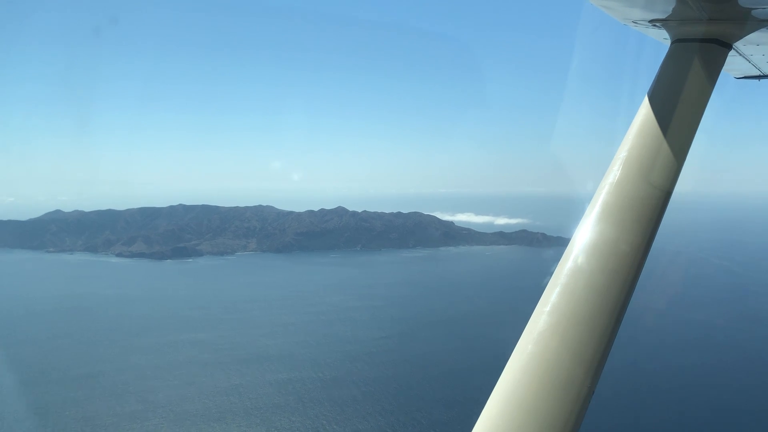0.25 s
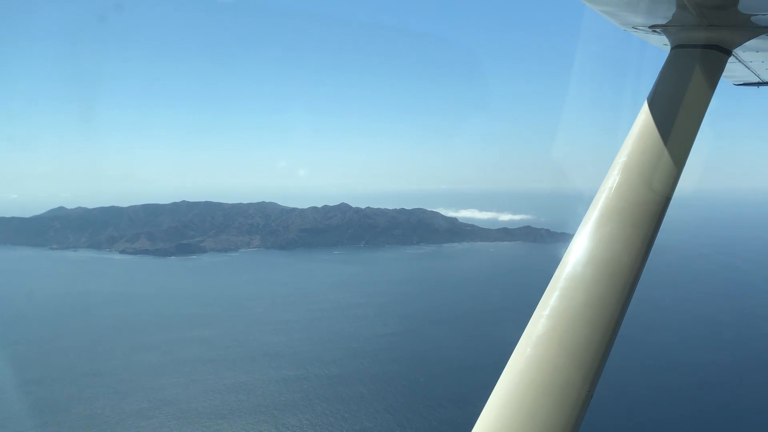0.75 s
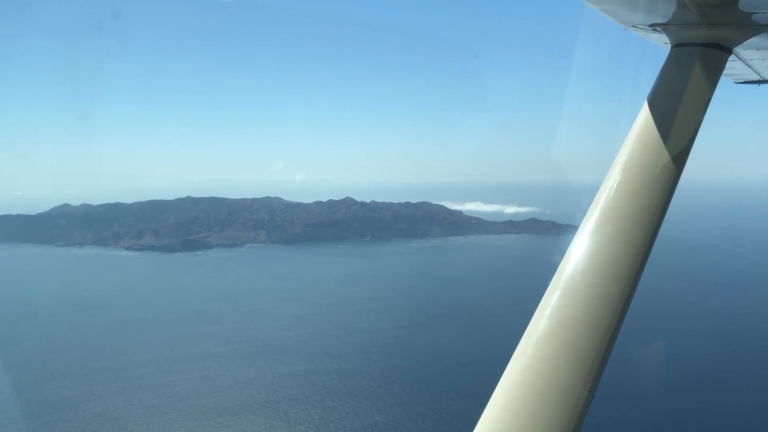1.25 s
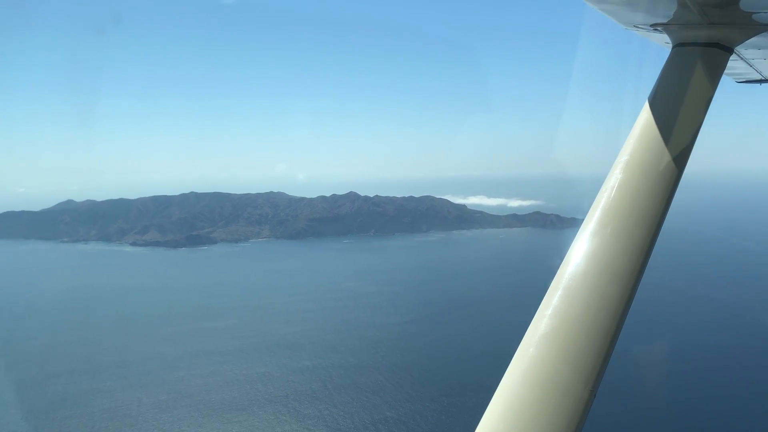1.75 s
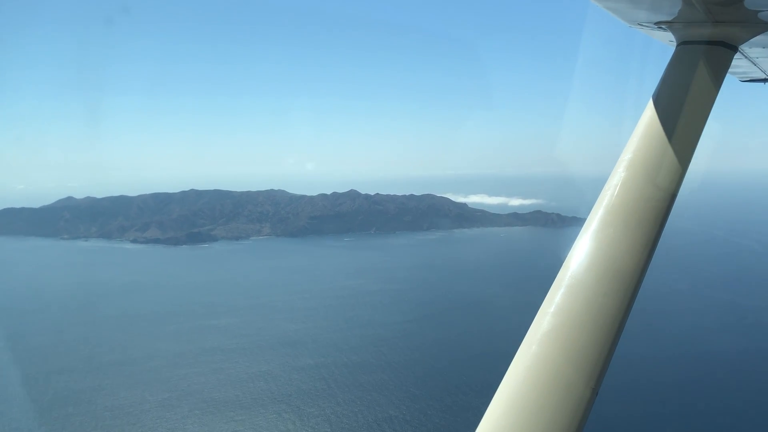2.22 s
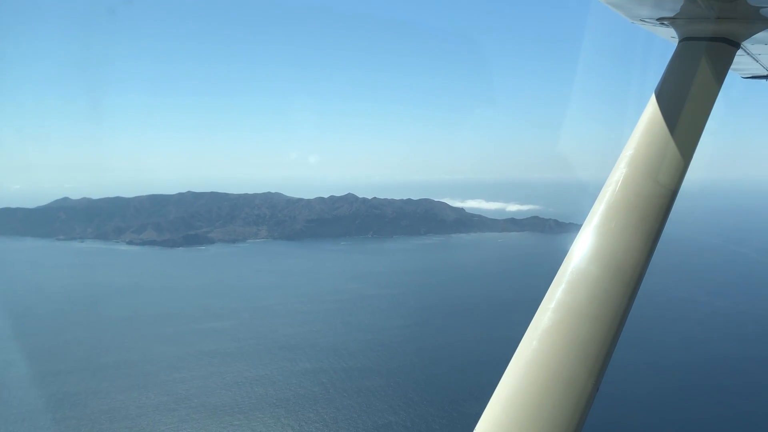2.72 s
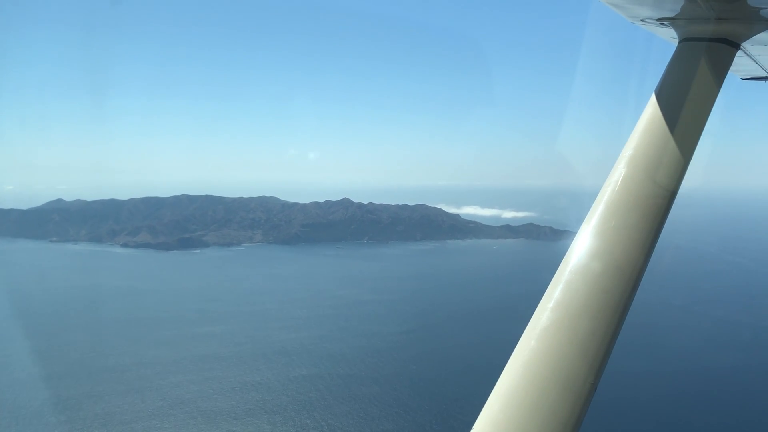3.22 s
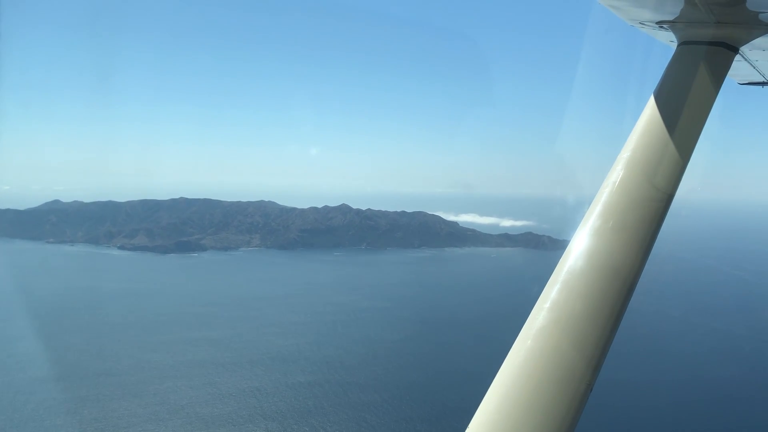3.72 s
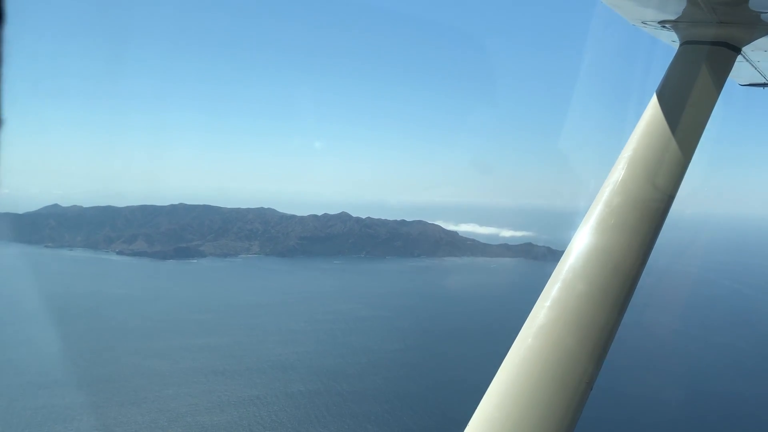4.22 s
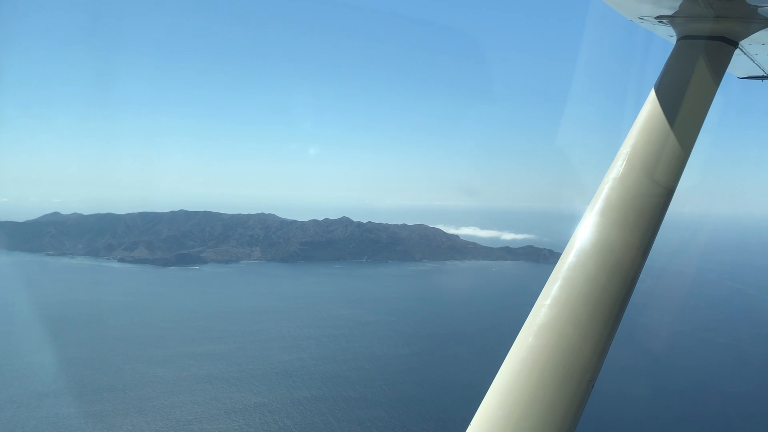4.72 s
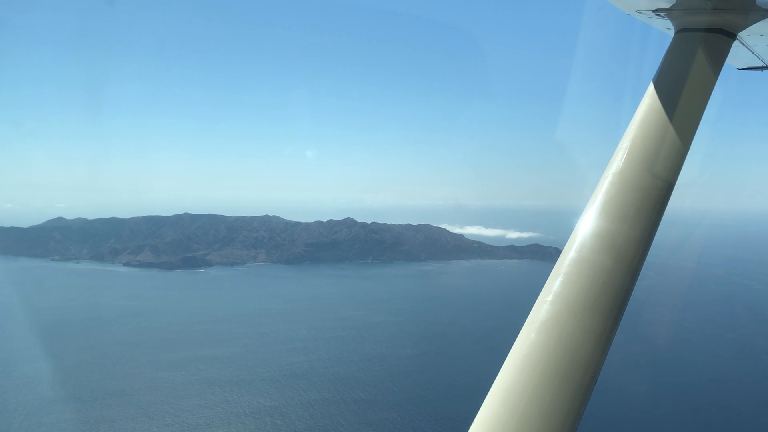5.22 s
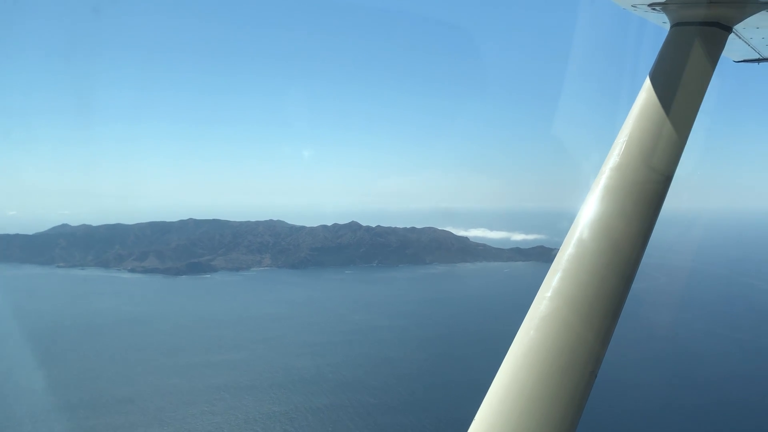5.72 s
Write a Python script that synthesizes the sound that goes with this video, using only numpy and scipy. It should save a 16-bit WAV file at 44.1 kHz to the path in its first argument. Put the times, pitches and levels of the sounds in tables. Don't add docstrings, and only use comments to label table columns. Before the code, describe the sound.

A continuous, dense cabin roar: low propeller hum, rough engine harmonics and a fast flutter from air beating on the hull, with thinner airy hiss above. Pitch is nearly constant, with one tiny dip and recovery after midway. Heard close inside a cramped light aircraft on a small handheld microphone with little deep bass; it neither starts nor stops.

```python
import sys
import numpy as np
from scipy import signal
from scipy.io import wavfile
from scipy.ndimage import uniform_filter1d

SR = 44100
rng = np.random.default_rng(int(sys.argv[2]) if len(sys.argv) > 2 else 0)


def boost_factor(decibels):
    exponent = np.asarray(decibels, float) / 20
    return 10 ** exponent


def int16_out(signal):
    q = np.round(np.clip(np.atleast_2d(signal).T, -1, 1) * 32767)
    wavfile.write(sys.argv[1], SR, q.astype(np.int16))


N = 262395


def evened(x):
    return x / np.sqrt(np.mean(x ** 2) + 1e-20)


def drift(rate_hz):
    t = np.arange(0, N, 512) / SR
    slow = np.zeros(len(t))
    for f in np.geomspace(0.2, rate_hz, 20):
        slow += np.sin(2 * np.pi * (f * t + rng.random())) / np.sqrt(f)
    return np.interp(np.arange(N) / SR, t, evened(slow))


# centre in Hz, width in Hz, lift in dB.
PANELS = [(156, 22, -2.5), (196.5, 29, 4.5), (425.6, 27, 3.5), (515, 86, 5), (734, 55, 0.5), (920, 45, 1),
          (1160, 51, 1.5), (1500, 130, 2.5), (2080, 350, 3), (2560, 110, 2.5), (3010, 200, -2),
          (3680, 250, 2), (4060, 140, 2.5), (4470, 200, -1), (5570, 500, 0.5), (8270, 950, 2)]


def air(spectrum, size, patchy_db, flicker_db):
    hop = size // 4
    hz = np.fft.rfftfreq(size, 1 / SR)
    frames = N // hop + 5
    real, imag, patches = rng.standard_normal((frames, len(hz), 3)).T
    patches = uniform_filter1d(patches, size=size // 128, axis=0)
    patches = evened(uniform_filter1d(patches, size=8, axis=1))
    flicker = evened(uniform_filter1d(rng.standard_normal(frames), size=3))

    f, density_db = np.transpose(spectrum)
    shape_db = np.interp(np.log(hz + 1), np.log(f + 1), density_db)
    for centre, width, lift_db in PANELS:
        shape_db += lift_db / (1 + (2 * (hz - centre) / width) ** 4)

    level_db = shape_db[:, None] + patchy_db * patches + flicker_db * flicker
    noise = signal.istft((real + 1j * imag) * boost_factor(level_db), nperseg=size, noverlap=size - hop)[1][:N]
    power = np.sum(boost_factor(shape_db) ** 2) * SR / size
    return np.sqrt(power) * evened(noise)


def prop_wash(cycle):
    turn = 2 * np.pi * cycle
    return 0.35 * np.cos(turn) + 0.3 * np.cos(2 * turn) + 0.19 * np.cos(4 * turn)


# frequency in Hz, density in dB per Hz.
HISS = [(150, -100), (900, -68.5), (1600, -67.5), (2300, -72.5), (3000, -73.5), (3700, -75.5), (5000, -75),
        (6200, -78), (7500, -79.5), (9000, -82), (10000, -84.5), (11000, -83.5), (13000, -86.5),
        (15800, -87.5)]


def seal_hiss(throb, gust, speed):
    gust_db, db_per_rev = 0.06, 2.0
    hiss = boost_factor(0.33 * throb) * air(HISS, size=1024, patchy_db=0.82, flicker_db=0.2)
    return boost_factor(gust_db * gust + db_per_rev * (speed - speed.mean())) * hiss


# frequency in Hz, density in dB per Hz.
BOOM = [(12, -84), (24, -78), (38, -55), (60, -47), (110, -44), (165, -42), (230, -49), (290, -46),
        (400, -52.5), (600, -55.5), (850, -59.5), (1350, -65.5), (2500, -80), (5000, -100)]


def hull_boom(throb, gust):
    gust_db = -0.14
    boom = boost_factor(0.86 * throb) * air(BOOM, size=4096, patchy_db=0.2, flicker_db=0.34)
    return boost_factor(gust_db * gust) * boom


# start in seconds, speed in rev/s, load on the drone in dB.
SHAFT = [(0.0, 41.814, -1.2), (0.5, 41.8, -0.7), (0.8, 41.848, 0.4), (1.25, 41.848, 1.2),
         (1.65, 41.803, 1.1), (2.05, 41.843, 0.7), (2.9, 41.826, 0.1), (3.3, 41.655, -1.3),
         (3.5, 41.66, -1.5), (3.8, 41.75, -0.4), (4.25, 41.781, -0.1), (4.75, 41.845, -0.8),
         (5.3, 41.831, -0.6), (5.95, 41.828, 0.4)]


def shaft():
    start, speed, load_db = np.transpose(SHAFT)
    t = np.arange(N) / SR
    return np.interp(t, start, speed), np.interp(t, start, load_db)


# centre in Hz, width in Hz, change from start to end in dB.
NODES = [(167, 15, -1.5), (334, 20, -2), (482, 15, -5), (530, 50, 4.5), (586, 15, 3), (752, 20, -6),
         (836, 20, -4)]


def tone(cycle, multiple, db, through_hull, waver_db):
    hull_lag, hull_spread = 0.8625, 24.2
    lag = through_hull * (hull_lag * multiple + hull_spread * np.sqrt(multiple))
    hz = multiple * SHAFT[0][1] / 2
    node_db = sum(change / (1 + (2 * (hz - f) / width) ** 2) for f, width, change in NODES)
    path_db = node_db * (np.arange(N) / N - 0.5) + waver_db * drift(5)
    return np.sqrt(2) * boost_factor(db + path_db) * np.cos(2 * np.pi * (multiple * cycle - lag))


ENGINE_MULTIPLES = [2, 4, 5, 7, 8, 9, 10, 11, 13, 14, 15, 16, 19, 20, 21, 22, 23, 25, 26, 27, 28, 29, 32,
                    34, 35, 39, 40, 48, 53]
ENGINE_DB = [-44, -38, -35.5, -45, -22.5, -41, -33, -40, -41, -33.5, -42, -29.5, -52, -41.5, -38.5, -46,
             -33.5, -30, -42, -47.5, -41, -48, -39.5, -52, -51, -52, -50, -60, -52]


def engine(cycle):
    return sum(tone(cycle, k, db, True, 0.36) for k, db in zip(ENGINE_MULTIPLES, ENGINE_DB))


# level of overtone 1, 2, 3 .. in dB rms.
BLADE_DB = [-21.5, -21, -48, -40.5, -35, -37.5, -56, -53.5, -67]


def propeller(cycle):
    return sum(tone(cycle, 6 * (k + 1), db, k > 1, 0.3) for k, db in enumerate(BLADE_DB))


def scene():
    speed, load_db = shaft()
    cycle = np.cumsum(speed) / SR / 2
    throb = prop_wash(cycle)
    gust = drift(0.95)
    turbulence = seal_hiss(throb, gust, speed) + hull_boom(throb, gust)
    drone = boost_factor(load_db) * (engine(cycle) + propeller(cycle))
    return (turbulence + drone)[None]


def low_pass(x):
    return signal.sosfilt(signal.butter(12, 15710, fs=SR, output="sos"), x)


def record(dry):
    cut_hz, ceiling = 33, 1.05
    bass_cut = signal.butter(3, cut_hz, "high", fs=SR, output="sos")
    heard = signal.sosfiltfilt(bass_cut, dry)
    mix = ceiling * np.tanh(heard / ceiling)
    return low_pass(mix)


dry = scene()
out = record(dry)
int16_out(out)
```